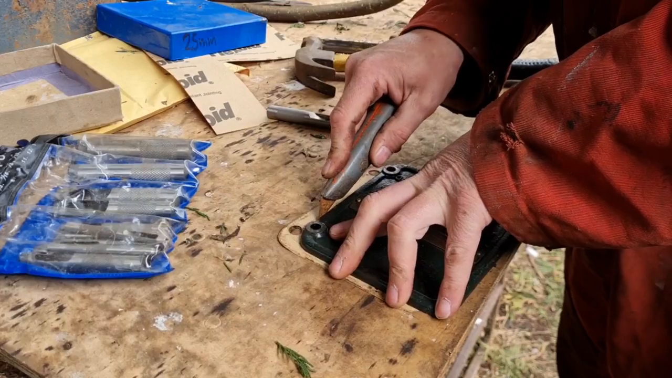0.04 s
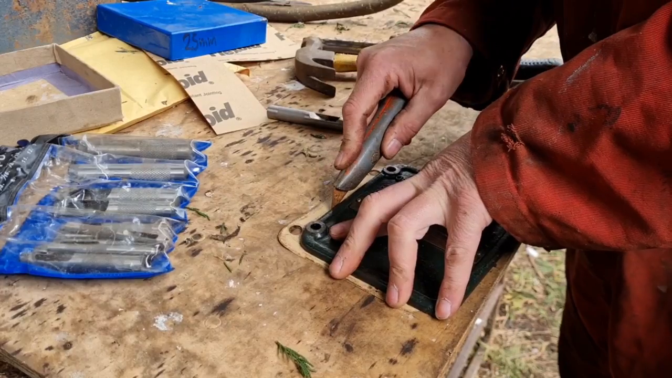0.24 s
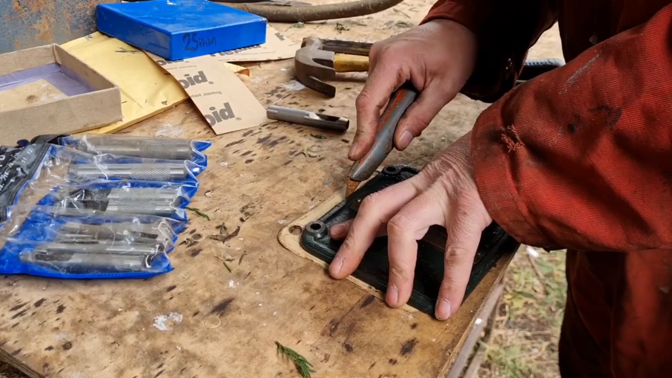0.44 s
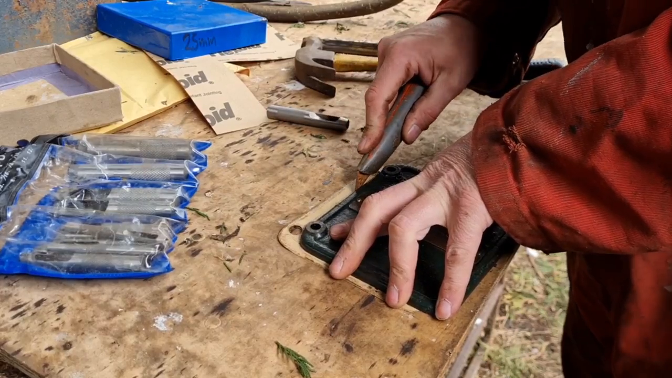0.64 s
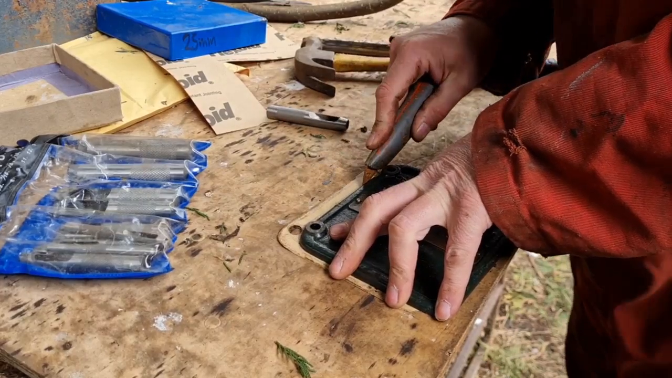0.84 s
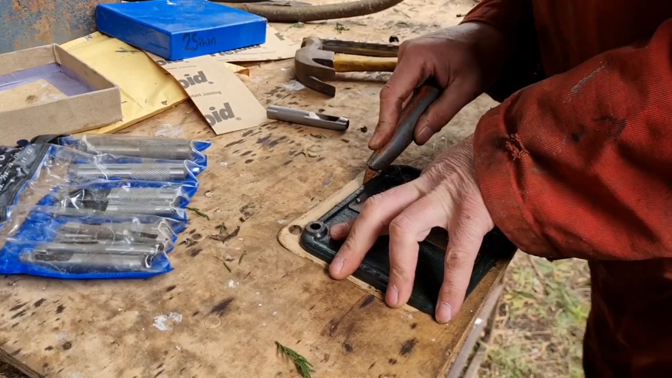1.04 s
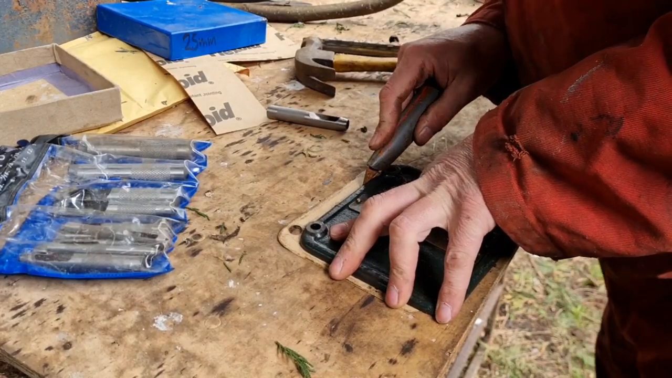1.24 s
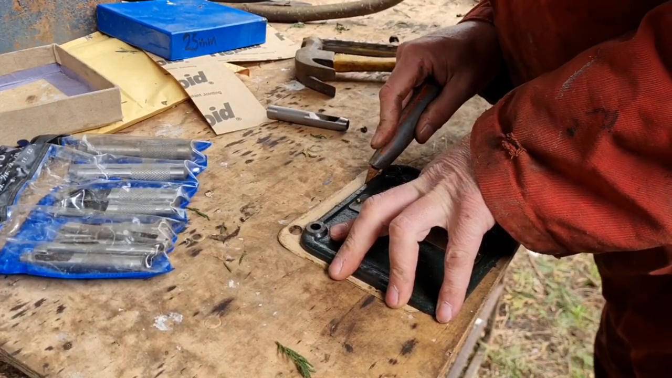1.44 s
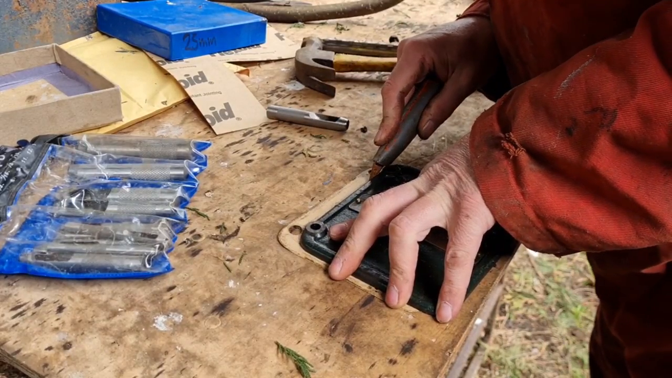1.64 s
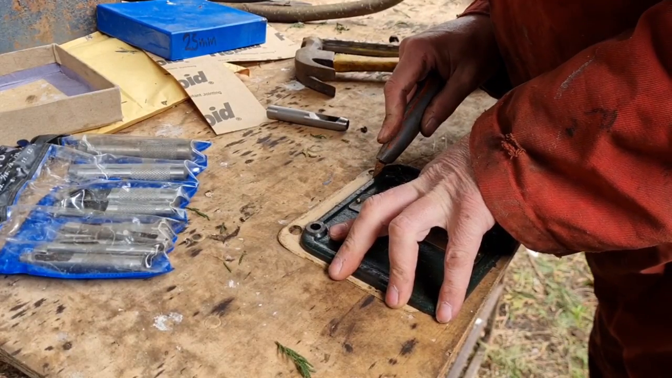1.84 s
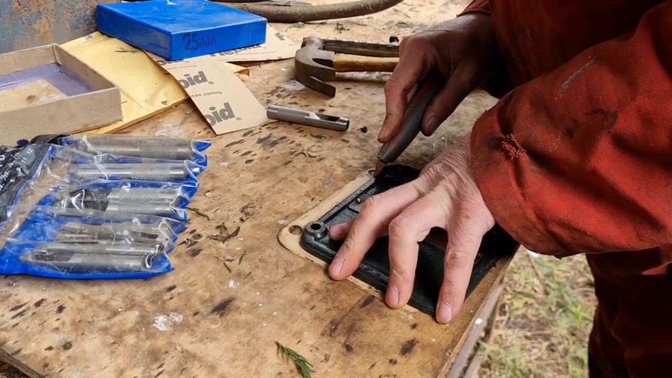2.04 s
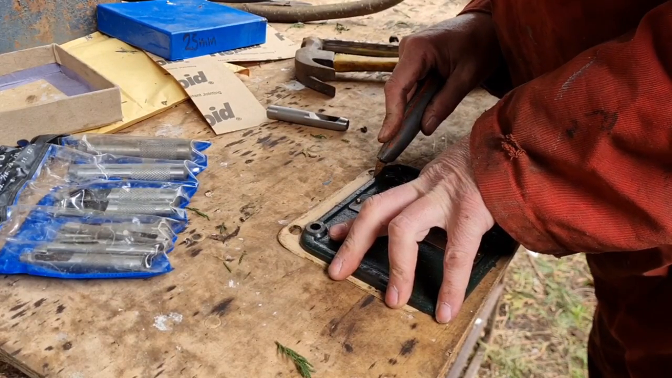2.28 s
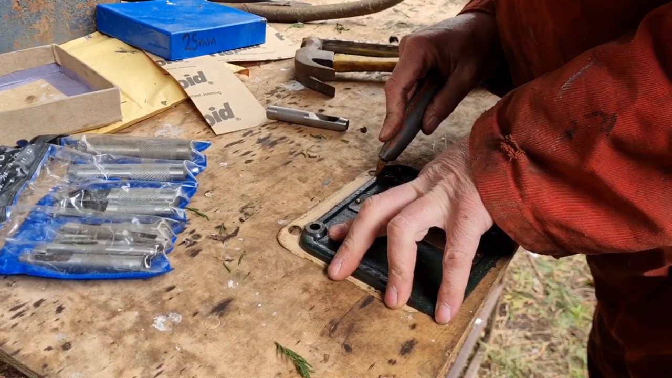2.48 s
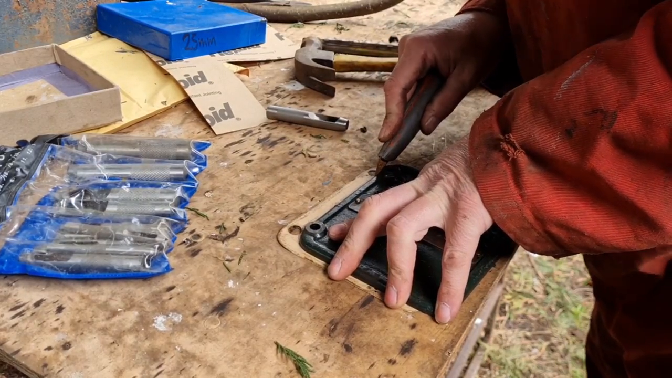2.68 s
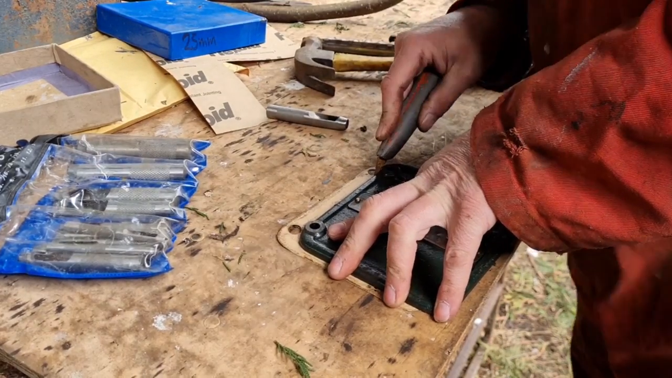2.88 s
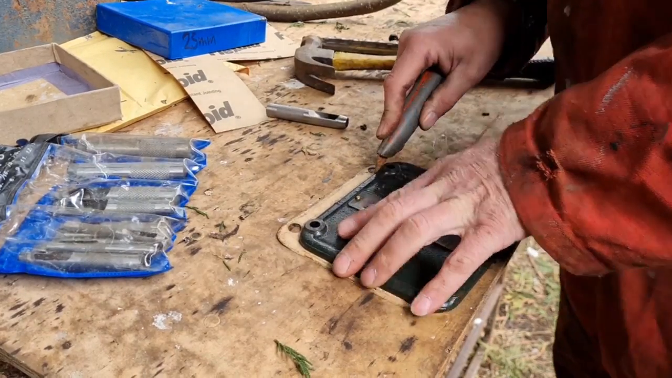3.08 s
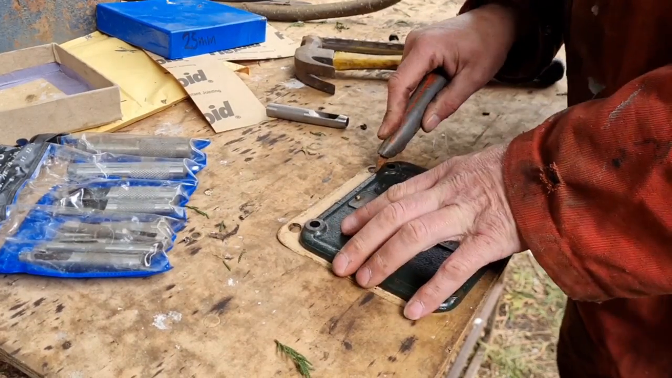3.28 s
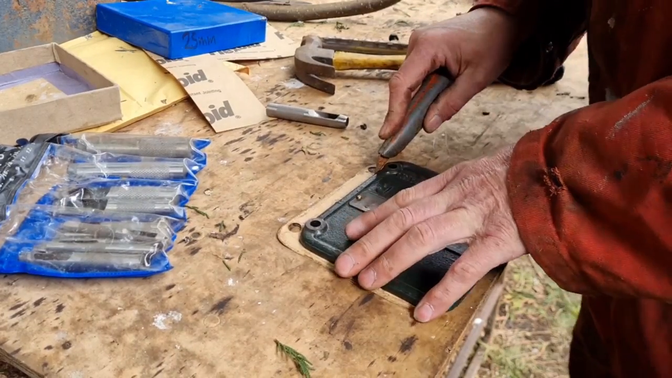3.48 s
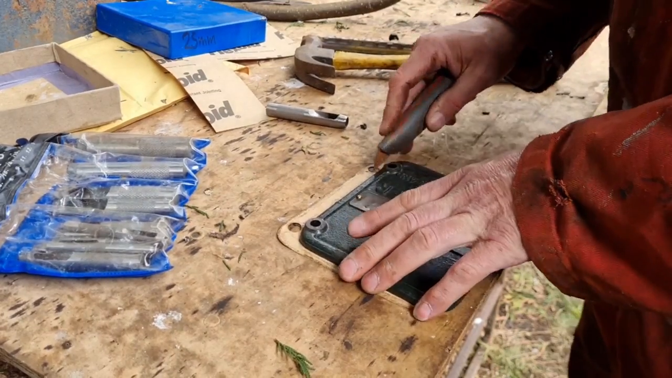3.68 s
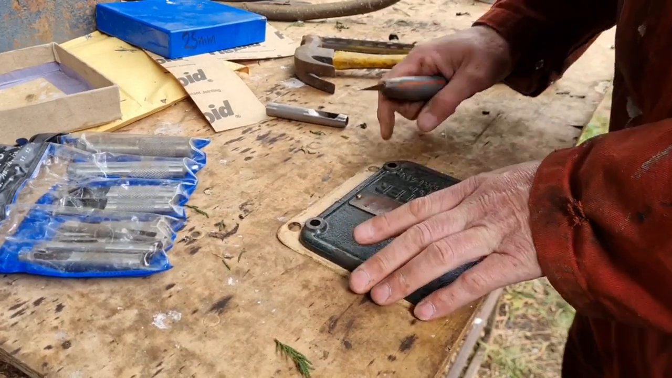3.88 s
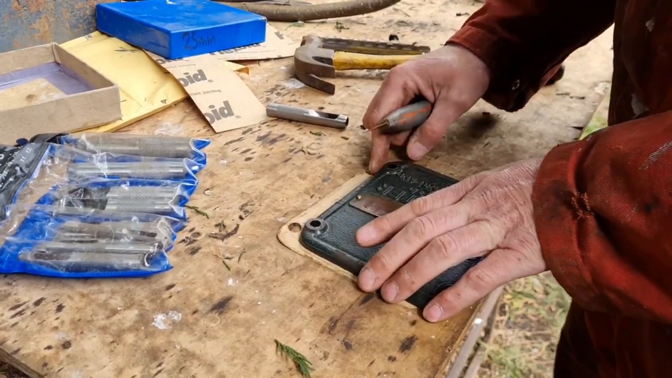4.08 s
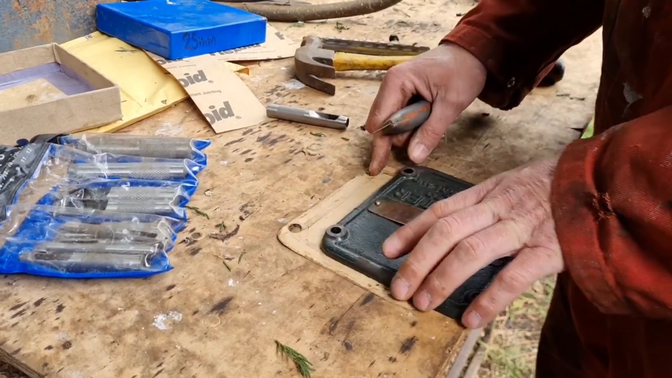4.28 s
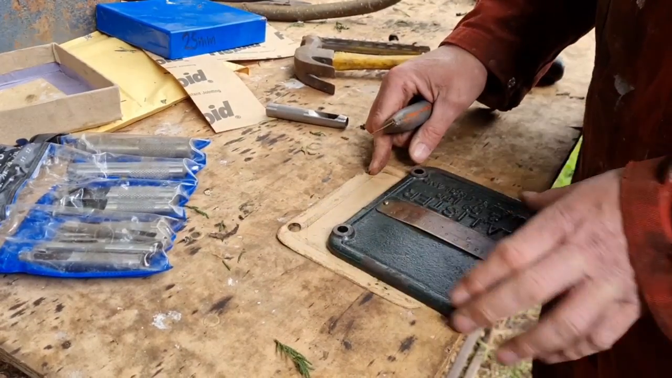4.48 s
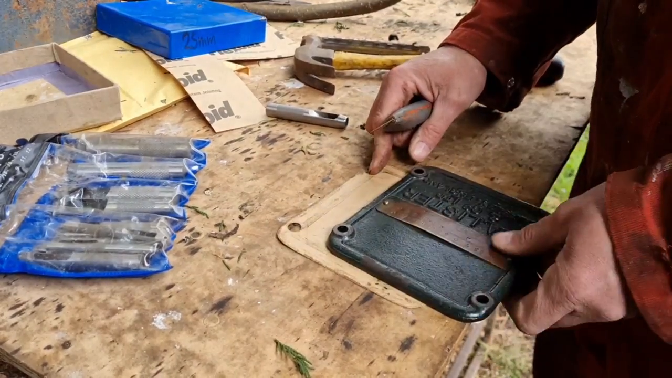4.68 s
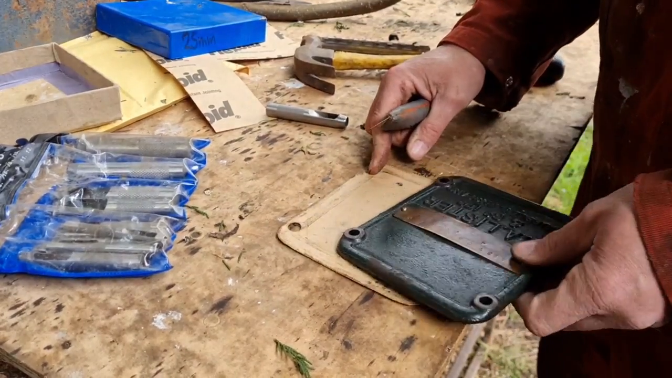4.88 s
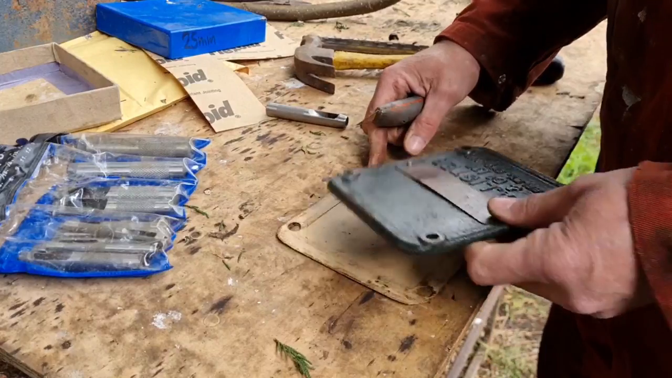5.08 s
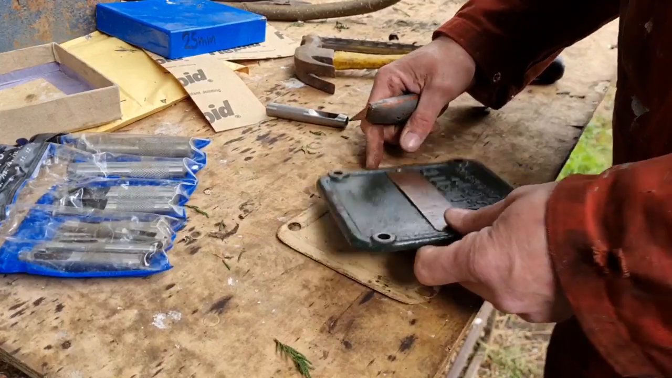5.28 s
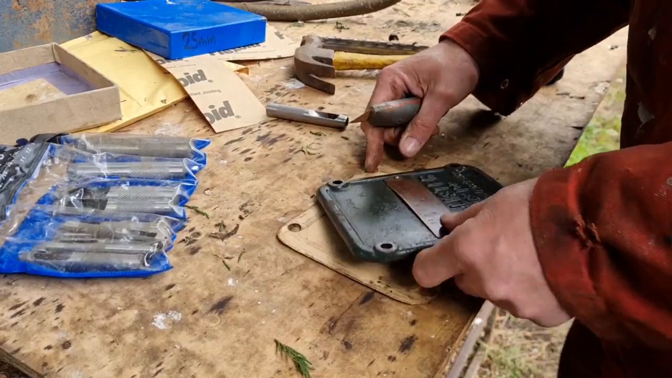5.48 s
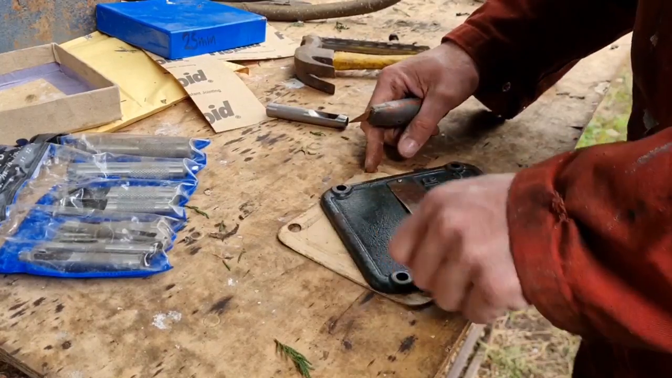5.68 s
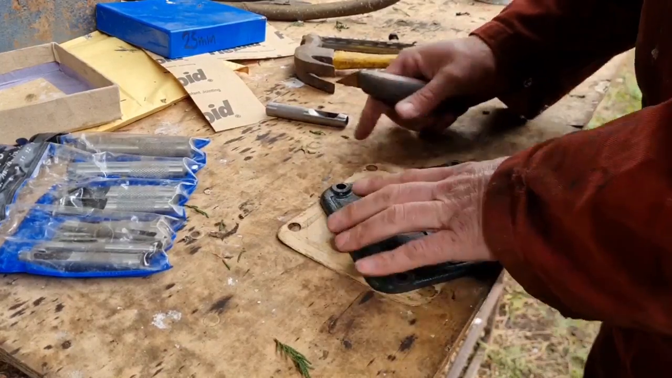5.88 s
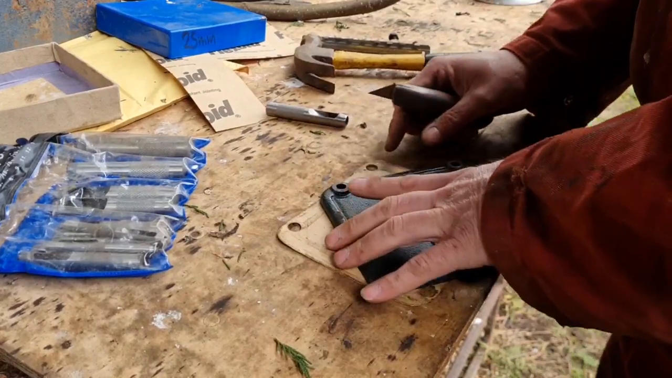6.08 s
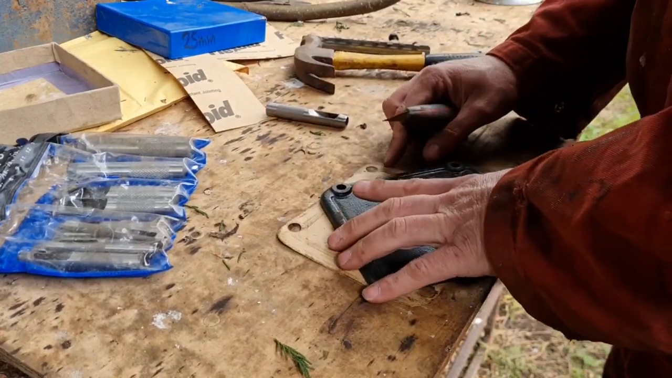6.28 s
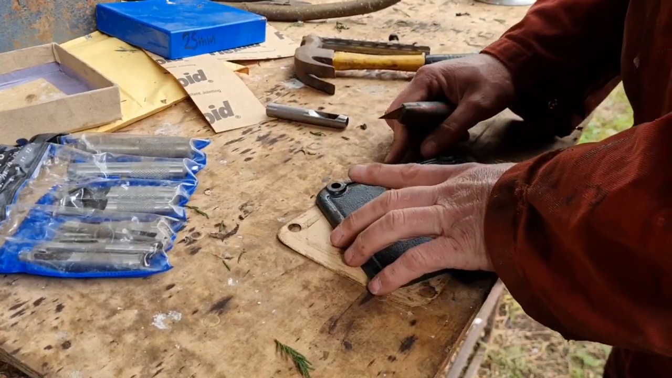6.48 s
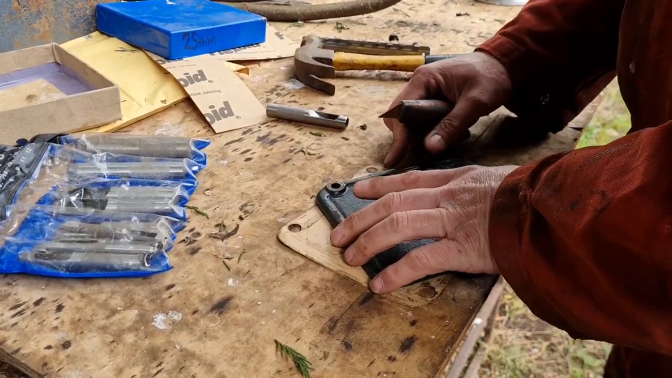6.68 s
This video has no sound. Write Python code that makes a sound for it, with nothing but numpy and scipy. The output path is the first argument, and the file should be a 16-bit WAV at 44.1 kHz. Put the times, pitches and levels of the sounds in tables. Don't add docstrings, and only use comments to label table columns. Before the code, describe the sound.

Close up on a wooden bench outdoors, a knife cuts stiff paper in short crackly scrapes with small metal ticks. Quiet rubbing follows, then a metal cover slides, drags and lands with a loud clanking knock and a softer rattling one. A warble ends at the start; another bird repeats two falling slides and three lower notes among trees. Wind rumbles low on the stereo microphone.

```python
import sys
import numpy as np
from scipy import signal
from scipy.fft import rfft, irfft, next_fast_len
from scipy.io import wavfile
from scipy.ndimage import uniform_filter1d

SR = 44100
rng = np.random.default_rng(int(sys.argv[2]) if len(sys.argv) > 2 else 0)


def makeup_ratio(level_db):
    decades = np.asarray(level_db, float) / 20
    return 10 ** decades


def master(y):
    cut = np.clip(np.atleast_2d(y).T, -1, 1)
    pcm = np.round(cut * 32767)
    wavfile.write(sys.argv[1], SR, pcm.astype(np.int16))


N = 297234
SIDES = np.array([[0.5], [-0.5]])


def unit(x):
    return x / np.sqrt(np.mean(x ** 2) + 1e-20)


def along(points, hz):
    f, v = np.transpose(points)
    return np.interp(np.log(hz + 1), np.log(f + 1), v)


def shape(spectrum):
    return lambda hz: makeup_ratio(along(spectrum, hz))


def modes(table):
    def response(f):
        total = 0
        for k, (centre, width, db) in enumerate(table):
            damping = 1j * f * width
            total = total + (-1) ** k * makeup_ratio(db) * damping / (centre * centre - f * f + damping)
        return total
    return response


def filtered(x, response):
    m = next_fast_len(N + SR // 2)
    return irfft(rfft(x, m) * response(np.fft.rfftfreq(m, 1 / SR)), m)[..., :N]


def wobble(rate):
    knots = rng.standard_normal((2, int(N * rate / SR) + 2))
    return np.array([np.interp(np.arange(N) * rate / SR, np.arange(len(k)), k) for k in knots])


def spread(pair, response, alike):
    def turn(hz):
        return np.arccos(np.clip(along(alike, hz), -1, 1)) / 2
    mid, side = filtered(pair, lambda hz: response(hz) * [np.cos(turn(hz)), np.sin(turn(hz))])
    return unit(np.array([mid + side, mid - side]))


def even(x, span_s):
    power = np.abs(uniform_filter1d(x ** 2, int(span_s * SR), axis=-1))
    return x / np.sqrt(power + 0.041)


def swells(starts, holds, rise_db_s, fall_db_s, *levels_db):
    t = np.arange(0, N + 64, 64) / SR
    early = np.maximum(starts[:, None] - t, 0)
    late = np.maximum(t - (starts + np.abs(holds))[:, None], 0)
    power = makeup_ratio(2 * (-rise_db_s * early - fall_db_s * late))
    curves = [10 * np.log10(makeup_ratio(2 * db) @ power + 1e-30) for db in levels_db]
    return [np.interp(np.arange(N) / SR, t, curve) for curve in curves]


def echoes(x, t60, gap_s):
    t = np.arange(SR // 2) / SR
    tail = rng.standard_normal((2, len(t))) * makeup_ratio(-60 * t / t60) * (t > gap_s)
    return signal.oaconvolve(x, tail / np.linalg.norm(tail[0]), axes=1)[:, :N]


def notes(table, bend, swell, flutter_db, rough_hz, pan_db=0, lead=0, attack=0.012):
    out, waver = np.zeros((2, N + SR)), rough_hz * wobble(300)[0]
    for s, length, start_hz, end_hz, db in table:
        at = int(s * SR)
        u = np.linspace(0, 1, int(length * SR))
        glide = (np.exp(-bend * u) - np.exp(-bend)) / (1 - np.exp(-bend))
        hz = end_hz + (start_hz - end_hz) * glide + np.resize(waver[at:], len(u))
        size = np.minimum(u / attack, 1) * np.minimum((1 - u) / 0.22, 1) * makeup_ratio(swell * (u - 1.0815))
        tone = np.sin(2 * np.pi * np.cumsum(hz) / SR + lead * SIDES)
        out[:, at:][:, :len(u)] += makeup_ratio(db + 6.5) * size * tone
    return out[:, :N] * makeup_ratio(flutter_db * wobble(120) + pan_db * SIDES)


# f/Hz, left-right level/dB
PORT_TILT = [(60, 4), (240, -1.5), (950, -3.5), (3770, -1), (15000, 8)]


def tilted(x):
    return filtered(x, lambda hz: makeup_ratio(SIDES * along(PORT_TILT, hz)))


# f/Hz, left lead/rad
PORT_LEAD = [(100, 0), (1400, 0.9), (2200, 1.85), (6000, 1.63), (12000, 0.092)]


def ports(x):
    return tilted(filtered(x, lambda hz: np.exp(1j * SIDES * along(PORT_LEAD, hz))))


# t/s, hold/s, level/dB, left-right level/dB
GUSTS = [(0, 0.17, -30.5, 7), (0.18, 0.15, -41.5, 14.5), (0.384, 0.18, -36, 15.5),
         (0.659, 0.21, -37.5, 24.5), (0.772, 0.27, -30, 11), (1.129, 0.056, -33, 9),
         (1.295, 0.056, -37, 20), (1.467, 0.11, -29, 18), (1.683, 0.074, -35.5, 12),
         (1.854, 0.091, -40.5, 13.5), (2.07, 0.02, -42, 11), (2.232, 0.16, -36.5, 33),
         (2.453, 0.034, -26.5, 5), (2.533, 0.25, -34, 8), (2.784, 0.2, -46.5, 7), (3.109, 0.12, -36.5, 15),
         (3.19, 0.15, -41, 0), (3.774, 0.019, -45.5, 27), (4.378, 0.069, -46, 24),
         (4.475, 0.14, -43.5, 20.5), (4.699, 0.069, -39.5, 33), (4.826, 0.2, -38, 24),
         (5.083, 0.18, -33.5, 24), (5.417, 0.23, -44.5, 14), (6.022, 0.097, -43.5, 24),
         (6.188, 0.043, -42, 32), (6.307, 0.073, -42, 28.5), (6.492, 0.21, -49, 15)]
# t/s, peak level/dB, left-right level/dB, length/s
THUMPS = [(0.385, -30, -5, 0.0076), (0.494, -38, -1.5, 0.048), (1.295, -48, -7, 0.015),
          (1.45, -40, 2, 0.013), (1.58, -46.5, -3, 0.11), (1.723, -33.5, 13, 0.01),
          (2.219, -37.5, 27, 0.0039), (2.261, -42.5, 30.5, 0.0078), (2.465, -26, 20, 0.01),
          (2.498, -31.5, 20, 0.024), (2.65, -39.5, 14, 0.033), (2.709, -39.5, 15.5, 0.018),
          (4.131, -45.5, 2, 0.024), (4.4, -39, 19, 0.012), (4.711, -46, 4, 0.0071),
          (4.893, -48.5, 6, 0.098), (5.14, -30.5, 32, 0.0049), (5.26, -40.5, 14, 0.017)]
# f/Hz, level/dB
RUMBLE = [(12, -52), (20, -29), (40, -3.5), (59, 5.5), (92, -6.5), (125, -7), (200, -25.5), (260, -79),
          (440, -120)]
# f/Hz, level/dB
EDDY_EDGE = [(70, 7), (130, 2.5), (250, -1.5), (400, -20), (700, -81)]


def wind():
    breeze_db, rise_db_s, fall_db_s = -58, 399.5, 298.5
    s, hold, db, pan_db = np.transpose(GUSTS)
    gusts_db = swells(s, hold, rise_db_s, fall_db_s, db + 0.29 * pan_db, db - 0.51 * pan_db)
    gusts = np.hypot(makeup_ratio(np.array(gusts_db)), makeup_ratio(breeze_db))
    lumps = makeup_ratio(7.04 * wobble(16))
    rumble = spread(rng.standard_normal((2, N)), shape(RUMBLE), [(30, 0.087)])
    low = unit(lumps * even(rumble, span_s=0.047))
    edge = even(spread(rng.standard_normal((2, N)), shape(EDDY_EDGE), [(30, 0.14)]), span_s=0.0243)
    t = np.arange(0, N + 64, 64) / SR
    bursts = np.zeros((2, len(t)))
    for s, peak_db, pan, length in THUMPS:
        bursts += makeup_ratio(peak_db + 1.0 + pan * SIDES) * np.exp(-((t - s - 0.67 * length) / length) ** 2)
    bursts = np.array([np.interp(np.arange(N) / SR, t, b) for b in bursts])
    roll = makeup_ratio(0.85) * gusts * (low + makeup_ratio(-17.0 + 2.0 * wobble(38)) * lumps * edge)
    return roll + bursts * edge


# f/Hz, level/dB
FAR_AIR = [(24, -33.5), (40, 3.5), (69, -14.5), (185, -5.5), (320, -1.5), (422, -12.5), (663, -13.5),
           (3650, -43.5), (5310, -37.5), (6330, -34), (8340, -48.5), (11300, -40.5), (16000, -48)]
# f/Hz, left-right likeness
FAR_LIKENESS = [(60, 0.72), (130, 0.99), (290, 0.97), (640, -0.7), (1410, -0.16), (3100, -0.29),
                (6820, 0.58), (15000, 0.94)]


def air():
    level_db = -57.5 + 0.87 + 0.27 * wobble(2.9)[0]
    return makeup_ratio(level_db) * spread(rng.standard_normal((2, N)), shape(FAR_AIR), FAR_LIKENESS)


def grains(per_s, spread_db, hiss):
    chance, size, noise = rng.random((2, N)), rng.standard_normal((2, N)), rng.standard_normal((2, N))
    spikes = (chance < per_s / SR) * makeup_ratio(spread_db * np.clip(size, -2, 2)) * np.sign(noise)
    return unit(spikes) + hiss * rng.standard_normal((2, N))


def patchy(x, patchy_db):
    z = signal.stft(x, nperseg=256)[2]
    field = uniform_filter1d(rng.standard_normal(z.shape[1:]), size=7, axis=0)
    field = uniform_filter1d(field, size=10, axis=1)
    return signal.istft(z * makeup_ratio(patchy_db * unit(field)), nperseg=256)[1][:, :N]


def strokes(table, rise_db_s, fall_db_s, hiss_db, wood_db):
    s, hold, db, tear_db = np.transpose(table)
    blade_db = db + 0.66 * tear_db + hiss_db
    fizz, hiss, rasp = swells(s, hold, rise_db_s, fall_db_s, db + tear_db, blade_db, db)
    wood = 0.9 * (rasp + 60) - 60 + wood_db
    return makeup_ratio(np.array([fizz, hiss, rasp, wood]))


# t/s, hold/s, pressure level/dB, tearing level/dB over it
CUTS = [(0, 0.0022, -60.5, -2.5), (.02, 0.039, -70.5, -0.5), (.09, 0.086, -66.5, 1),
        (.21, 0.053, -57.5, -4.5), (.28, 0.19, -69, -2), (.37, 0.02, -59.5, -7.5), (.41, 0.075, -59, -2.5),
        (.47, 0.062, -54.5, -15), (.655, 0.042, -69, -9), (.685, 0.042, -52, -13),
        (.735, 0.018, -55, -11.5)]
# t/s, hold/s, pressure level/dB, tearing level/dB over it
RUBS = [(.86, 0.32, -74, -8), (1.16, 0.57, -76, -13.5), (1.6, 0.1, -68, -13), (1.8, 0.083, -71.5, -11.5),
        (2.4, 0.046, -66.5, -20), (2.46, 0.47, -76.5, -15), (2.84, 0.16, -70.5, -7),
        (3.075, 0.053, -76, 4.5), (3.0, 0.17, -72, -6.5), (3.2, 0.24, -75, -17), (3.57, 0.034, -86, 3.5),
        (3.745, 0.018, -64.5, -10), (3.86, 0.1, -88, 13.5), (4.125, 0.023, -70.5, -13),
        (4.27, .03, -59.5, -7), (4.3, 0.078, -58.5, -4), (4.39, 0.027, -62, -10.5), (4.44, 0.06, -73, -7),
        (4.535, 0.035, -69.5, 5.5), (4.6, 0.024, -68, -10), (4.66, 0.11, -72.5, -20), (5.04, 0.3, -73, -18),
        (5.48, 0.11, -69.5, -11.5), (5.615, 0.091, -66, -6), (5.72, .15, -69, -8.5), (6.1, 0.13, -76, 0.5)]
# t/s, hold/s, pressure level/dB, tearing level/dB over it
DRAGS = [(2.96, 0.053, -77.5, -3.5), (4.79, 0.023, -64, -9.5), (4.85, 0.062, -59.5, -12.5),
         (4.92, 0.074, -62, -2), (5.57, 0.053, -76, -6), (5.95, 0.12, -66.5, -10.5), (6.2, 0.046, -74, -3),
         (6.25, 0.14, -72.5, -28), (6.5, 0.27, -68.5, -18.5)]
# f/Hz, level/dB per Hz
FIZZ = [(3240, -11.5), (5500, 0.5), (6120, -13.5), (7000, -1), (7930, -10.5), (10300, -2.5), (15200, -4.5),
        (16000, -2)]
# f/Hz, level/dB per Hz
BLADE_HISS = [(1650, -18.5), (2800, -10), (3110, -6.5), (3940, -9.5), (5600, -15), (7280, -17),
              (12300, -120)]
# f/Hz, level/dB per Hz
RASP = [(530, -63), (900, -4.5), (1080, -3.5), (1750, -7.5), (2900, -20.5), (3770, -40.5), (6380, -120)]
# f/Hz, width/Hz, level/dB
COVER_MODES = [(2030, 340, 9.5), (1000, 330, 19), (2320, 170, 19), (1600, 40, -13)]
# f/Hz, width/Hz, level/dB
WOOD_MODES = [(270, 117, 0.5), (504, 204, 2), (787, 168, -3), (1171, 57, -4.5)]
# f/Hz, left-right likeness
NEAR_LIKENESS = [(60, 0.07), (130, 0.012), (290, 0.93), (640, 0.83), (1410, 0.067), (3100, 0.048),
                 (6820, 0.53), (15000, 1)]


def scrape():
    rest_db = -86.5
    cuts = strokes(CUTS, rise_db_s=486, fall_db_s=415.5, hiss_db=-5.5, wood_db=6.5)
    rubs = strokes(RUBS, rise_db_s=472, fall_db_s=307, hiss_db=-10.5, wood_db=0)
    drags = strokes(DRAGS, rise_db_s=472, fall_db_s=307, hiss_db=-2.5, wood_db=0.5)
    tearing, blade, pressure, load = cuts + rubs + drags
    tear = patchy(grains(per_s=800, spread_db=4.5, hiss=1.9), patchy_db=2.8)
    stick = makeup_ratio(0.9 * wobble(70)[0])

    def patch():
        return makeup_ratio(1.74 * wobble(30)[0])

    def paper_on_metal(hz):
        return shape(RASP)(hz) * (14.0 + np.abs(modes(COVER_MODES)(hz)))

    fizz = makeup_ratio(4.0) * tearing * patch() * spread(tear, shape(FIZZ), NEAR_LIKENESS)
    top = filtered(fizz, lambda hz: hz > 12000)
    fizz = fizz - 0.51 * top * (np.arange(N) > 4.45 * SR)
    hiss = makeup_ratio(6.0) * blade * patch() * spread(tear, shape(BLADE_HISS), NEAR_LIKENESS)
    rasp = makeup_ratio(0.5) * (pressure + makeup_ratio(rest_db)) * patch() * spread(tear, paper_on_metal, NEAR_LIKENESS)
    wood = even(spread(tear, modes(WOOD_MODES), NEAR_LIKENESS), span_s=0.04)
    wood = makeup_ratio(3.0) * (load + makeup_ratio(rest_db + 16.5)) * patch() * wood
    return tilted(stick * (fizz + hiss + rasp + wood))


def among_trees(x, near_db, far_db, t60, direct_db):
    near = makeup_ratio(near_db) * echoes(x, t60=0.28, gap_s=0.0025)
    far = makeup_ratio(far_db + 3.7 * wobble(70)) * echoes(x, t60=t60, gap_s=0.0086)
    return makeup_ratio(direct_db - 2.0) * x + near + far


# t/s, length/s, start f/Hz, end f/Hz, level/dB
WARBLE = [
    (0.0, 0.019, 3370, 3056, -44.5),
    (.032, 0.016, 4750, 4400, -51),
    (.041, 0.03, 4100, 3166, -45.5),
    (.1, 0.026, 4120, 3100, -49),
    (.158, 0.019, 3300, 3150, -63),
    (.172, 0.018, 4430, 4470, -52),
    (.189, 0.019, 4300, 3160, -51),
]
# t/s, length/s, start f/Hz, end f/Hz, level/dB
DIVES = [
    (.006, 0.085, 7530, 5750, -61.5),
    (.17, 0.091, 7100, 5050, -65),
]
# t/s, length/s, start f/Hz, end f/Hz, level/dB
WHISTLE = [
    (.238, 0.06, 3100, 3450, -42.5),
]
# t/s, length/s, start f/Hz, end f/Hz, level/dB
HELD = [
    (0.288, 0.41, 3450, 3480, -101),
]


def warbler():
    warble = notes(WARBLE, bend=2.2, swell=4, flutter_db=3, rough_hz=85, lead=1.56, attack=0.1)
    warble = warble + notes(DIVES, bend=0.3, swell=0.66, flutter_db=5.5, rough_hz=131, lead=1.2)
    warble = among_trees(warble, near_db=-4, far_db=-10, t60=0.9, direct_db=1)
    whistle = notes(WHISTLE, bend=14, swell=-0.6, flutter_db=0.8, rough_hz=8, lead=2.2)
    held = notes(HELD, bend=1.44, swell=-51, flutter_db=5, rough_hz=30, lead=2.12)
    return warble + whistle + held


# t/s, ring level/dB, click level/dB
TICKS = [(0.027, -62, -57), (0.0568, -62, -59), (0.1805, -62, -58), (0.2164, -60, -56), (0.356, -46, -62),
         (0.4025, -56, -57), (0.478, -54, -64), (0.6534, -62, -65), (4.2682, -54, -60.5), (4.507, -66, -65),
         (0.115, -60, -52), (0.232, -44, -56), (0.2796, -66, -51), (0.427, -54, -47.5), (0.5026, -38, -51),
         (0.529, -40, -56.5), (0.673, -53, -62), (0.6942, -56, -58.5), (0.7174, -44, -60),
         (0.8114, -70, -59), (3.078, -66, -56), (3.744, -46, -60.5), (4.534, -57, -56.5),
         (4.574, -64, -59.5), (4.735, -66, -68), (4.7807, -35, -50), (4.896, -59, -58), (4.979, -66, -55.5),
         (5.603, -47.5, -49), (5.645, -69, -54.5)]


def ticks():
    rings, clicks, t = np.zeros(N + SR), np.zeros(N + SR), np.arange(SR // 20) / SR
    decay_db = -60 * t / 0.019
    for s, db, click_db in TICKS:
        at = round(s * SR)
        hz = 1060 * (1 + 0.033 * rng.standard_normal())
        ring = np.sin(2 * np.pi * hz * t) + 0.32 * np.sin(2 * np.pi * 1.44 * hz * t)
        rings[at:][:len(t)] += makeup_ratio(db + decay_db) * ring
        click = np.minimum(t / 0.0015, 1) * rng.standard_normal(len(t))
        clicks[at:][:len(t)] += makeup_ratio(click_db + 7.0 + decay_db) * click
    colour = shape([(1500, 0), (3500, 6), (7000, 1.0), (11000, -5.0), (15500, -3.5)])
    out = rings[:N] + filtered(clicks[:N], colour)
    return ports(out) + makeup_ratio(-3.5) * echoes(out[None], t60=0.048, gap_s=0.0078)


# t/s, length/s, start f/Hz, end f/Hz, level/dB
PAIRS = [(1.058, 0.14, 7750, 6070, -65.5), (1.313, .17, 7660, 6055, -61), (2.036, 0.14, 7730, 6150, -57),
         (2.28, 0.18, 7700, 6080, -55), (3.005, .16, 7780, 6034, -56.5), (3.278, 0.17, 7540, 6060, -59),
         (4.05, 0.14, 7620, 6020, -58), (4.357, 0.16, 7580, 5895, -58.5), (5.136, .14, 7520, 5980, -61.5),
         (5.398, 0.18, 7600, 5914, -62.5), (6.198, 0.14, 7620, 5960, -60), (6.461, 0.16, 7540, 5970, -57.5)]
# t/s, length/s, start f/Hz, end f/Hz, level/dB
THREES = [(1.556, 0.11, 5440, 5000, -54), (1.717, 0.094, 5340, 4950, -53.5),
          (1.863, 0.11, 5210, 5030, -54.5), (2.524, 0.11, 5520, 4970, -50), (2.685, 0.1, 5440, 4960, -51.5),
          (2.84, 0.1, 5400, 4936, -52), (3.524, 0.099, 5340, 4880, -52.5), (3.682, 0.11, 5290, 4870, -52),
          (3.853, 0.08, 5280, 4850, -50.5), (4.606, 0.096, 5260, 4904, -51.5),
          (4.762, 0.093, 5290, 4910, -48), (4.928, 0.085, 5110, 4876, -50),
          (5.682, 0.11, 5100, 4820, -52.5), (5.85, 0.068, 5010, 4880, -53), (6.01, 0.073, 5030, 4860, -52)]


def small_bird():
    chips = []
    for s, _, start_hz, _, db in PAIRS + THREES:
        chip_db = db - 11 - 3 * s + 1 * (start_hz < 6000)
        chips.append((s - 0.014, 0.014, 5500, max(start_hz - 200, 6450), chip_db))
    turn_db = -1.2 * (np.arange(N) / SR - 2)
    slides = notes(PAIRS, bend=1.9, swell=5, flutter_db=3.5, rough_hz=55, pan_db=2.0, lead=0.46, attack=0.06)
    lows = notes(THREES, bend=5.5, swell=12, flutter_db=2.5, rough_hz=45, pan_db=7.5, lead=2.2, attack=0.04)
    lows = among_trees(lows, near_db=-8, far_db=-16, t60=0.6, direct_db=turn_db / 2)
    song = slides + notes(chips, bend=0.99, swell=0.1, flutter_db=-8.5, rough_hz=80)
    return among_trees(song, near_db=1.0, far_db=-11.5, t60=0.73, direct_db=turn_db) + lows


# t/s, length/s, start f/Hz, end f/Hz, level/dB
SING = [(2.92, 0.1, 3280, 3200, -85), (2.97, .06, 2960, 3000, -82), (3.02, .1, 3200, 3100, -85),
        (4.27, 0.13, 2044, 1990, -72), (4.51, 0.12, 2850, 2840, -80.5), (4.605, 0.035, 3440, 3370, -73),
        (4.85, .07, 2030, 2030, -75), (4.86, 0.14, 3380, 3400, -80), (4.95, 0.091, 2030, 2030, -74),
        (5.0, 0.049, 3480, 3330, -76), (5.545, 0.11, 2860, 2860, -73), (5.545, 0.1, 4230, 4250, -82),
        (5.56, 0.076, 2040, 2020, -74), (5.565, 0.045, 3360, 3350, -74), (5.66, 0.055, 4230, 4280, -79),
        (5.94, .06, 1930, 1910, -80), (6.0, 0.16, 1960, 2010, -72.5), (5.98, 0.12, 4050, 3820, -77),
        (6.19, 0.061, 4510, 4410, -79), (6.2, .06, 5060, 4870, -75), (6.2, 0.17, 2050, 1994, -80.5),
        (6.26, .1, 3850, 3900, -86), (6.6, .1, 3300, 3310, -82.5), (6.63, 0.046, 2500, 2520, -81)]


def singing_cover():
    sing = notes(SING, bend=1.5, swell=0.1, flutter_db=6, rough_hz=65)
    return tilted(sing + makeup_ratio(-5.5) * echoes(sing, t60=0.26, gap_s=0.0026))


# t/s, level/dB, contact/ms
BLOWS = [(5.382, -1, 1.54), (5.3897, -12.5, 0.61), (5.3946, -12, 0.62), (5.4002, -20, 0.71),
         (5.407, -33, 0.84), (5.416, -18, 1.03), (5.461, -10.5, 2.22), (5.503, -19.5, 2.34),
         (5.59, -30, 1.17), (5.7059, -22, 1.18), (5.709, -16, 0.89), (5.7165, -19, 1.15),
         (5.722, -15, 0.79), (5.723, -17, 1.36), (5.729, -30, 0.67), (5.736, -28, 0.83), (5.749, -43, .5),
         (5.755, -18.5, 0.96), (5.767, -18, 1.2), (5.776, -22, 1.2), (5.788, -24.5, 1.6), (5.811, -34, 1.4),
         (5.824, -17.5, 3.6)]
# f/Hz, width/Hz, level/dB
BENCH_MODES = [(118, 28, -4.5), (279.6, 54, 2), (394, 133, -6.5), (510, 6.5, -4.5), (700, 81, -6),
               (880, 71, -2), (1093, 140, -3.5), (1610, 110, -21.5), (2090, 130, -1), (3100, 400, -11)]
# f/Hz, width/Hz, level/dB
CLANK_MODES = [(660, 55, -5.5), (910, 110, 2), (1155, 83, -3.5), (1615, 150, 6.5), (2130, 130, -4),
               (2640, 89, 3.5), (3310, 180, -10)]


def knocks():
    push, crack, t = np.zeros(N + SR), np.zeros((2, N + SR)), np.arange(SR // 8) / SR
    decay_db = -60 * t / np.array([[0.075], [0.022]])
    for s, db, contact_ms in BLOWS:
        at = round(s * SR)
        u = t * 1000 / contact_ms
        push[at:][:len(t)] += makeup_ratio(db + 16.5) * u * np.exp(-u ** 2) / contact_ms
        crack_db = db + 6 - 21 * contact_ms
        crack[:, at:][:, :len(t)] += makeup_ratio(crack_db + decay_db) * rng.standard_normal(len(t))
    body = shape([(150, -13), (500, 21.5), (1500, -1.0), (4000, -11.0), (7500, -29.5), (9000, -56)])
    top = shape([(3000, -39), (6000, -21.5), (8500, -39), (11000, -26.5), (13000, -34), (16000, -35)])
    bench = filtered(push[:N], modes(BENCH_MODES))
    clank = filtered(crack[0, :N], lambda hz: body(hz) * (0.64 + modes(CLANK_MODES)(hz)))
    knock = bench + clank + filtered(crack[1, :N], top)
    return ports(knock) + makeup_ratio(-16) * echoes(knock[None], t60=0.25, gap_s=0.003)


def scene():
    return wind() + air() + scrape() + warbler() + ticks() + small_bird() + singing_cover() + knocks()


def top_cut(x):
    return signal.sosfilt(signal.butter(12, 16700, fs=SR, output="sos"), x)


def record(dry):
    top_hz, bass_hz = 15830, 35
    mix = filtered(dry, lambda hz: (hz < top_hz) / np.sqrt(1 + (bass_hz / (hz + 1)) ** 6))
    return top_cut(mix)


dry = scene()
out = record(dry)
master(out)
```